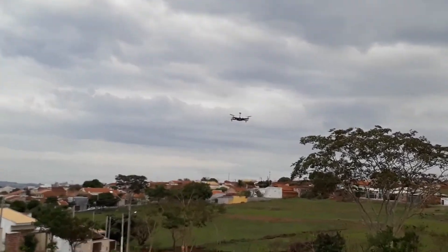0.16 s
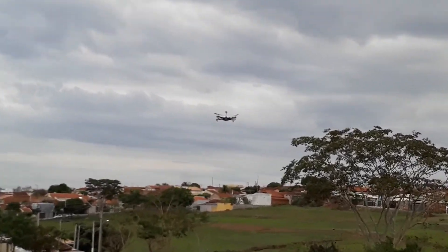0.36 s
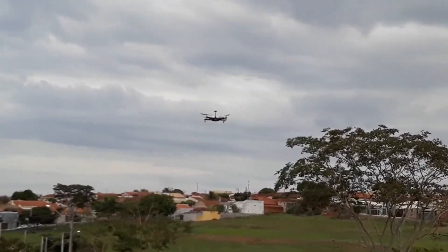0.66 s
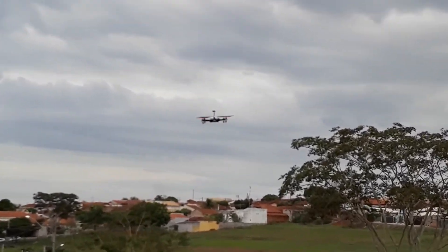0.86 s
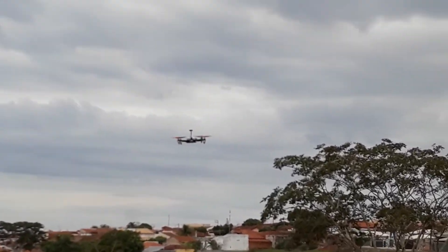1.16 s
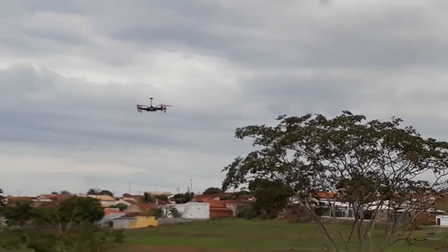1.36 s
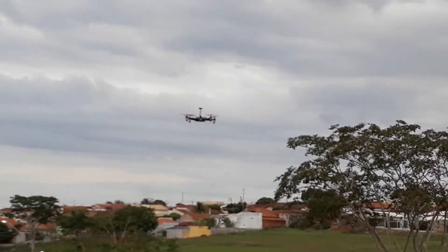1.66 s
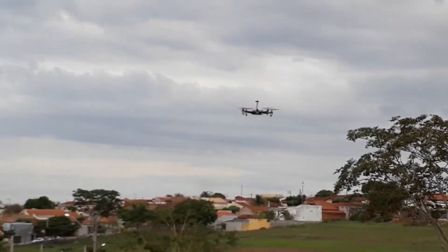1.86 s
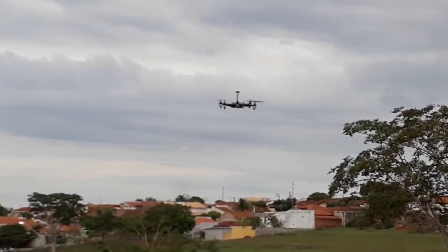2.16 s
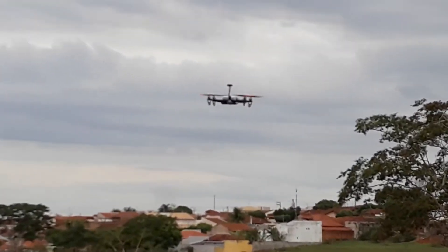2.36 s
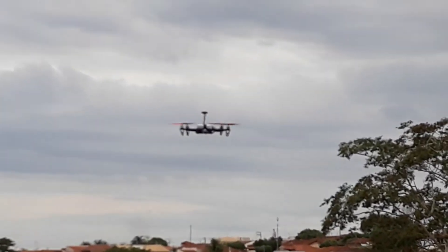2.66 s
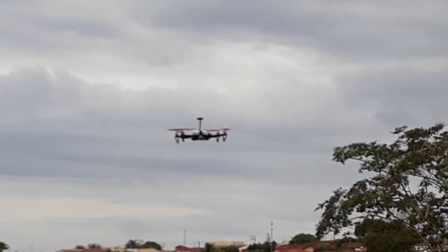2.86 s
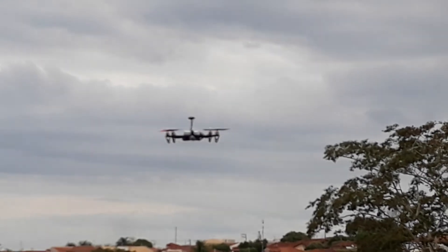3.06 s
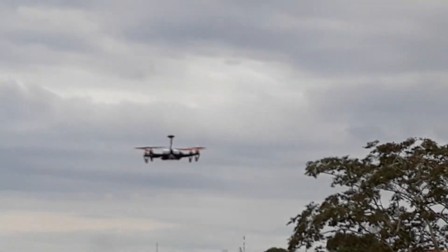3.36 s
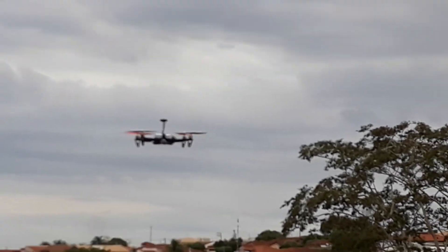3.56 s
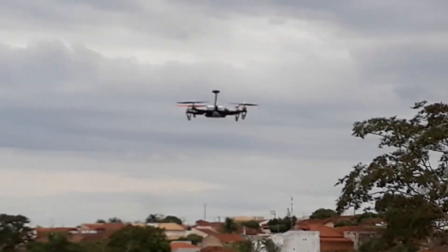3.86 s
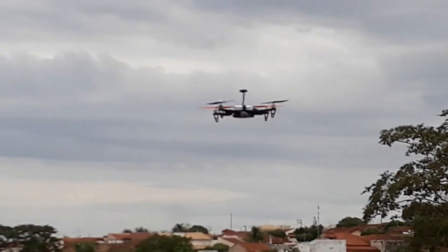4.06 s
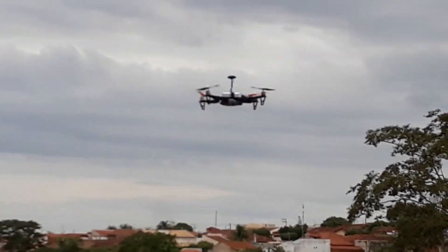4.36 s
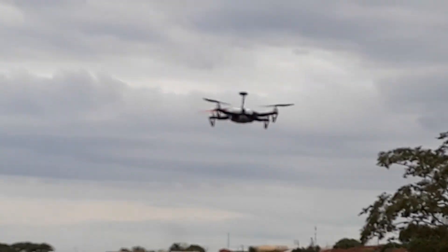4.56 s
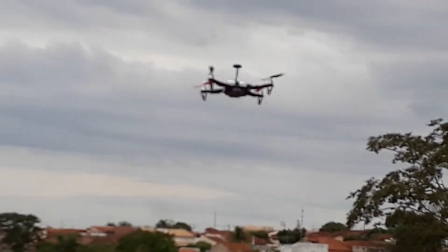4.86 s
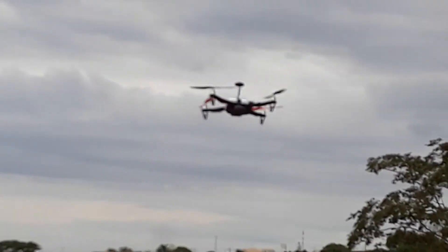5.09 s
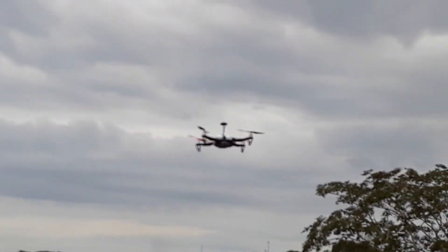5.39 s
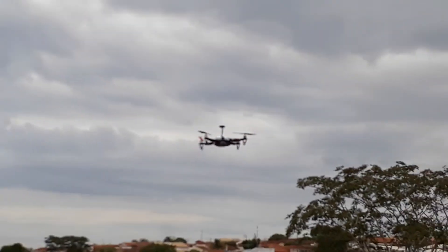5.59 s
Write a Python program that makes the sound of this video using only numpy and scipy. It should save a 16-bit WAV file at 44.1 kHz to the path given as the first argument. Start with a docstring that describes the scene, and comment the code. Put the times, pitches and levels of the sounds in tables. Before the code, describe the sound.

Outdoors, low gusts of wind buffet the microphone while a small drone whirs a little way off, its motors whining and shifting slightly in pitch. The wind hits hardest in the middle, then eases as the drone approaches. The propeller buzz and airy hiss swell to their loudest near the end, with a thin electronic whistle on top, over a very faint distant background of town and trees.

```python
"""Quadcopter approaching over open ground

A small quadcopter flies in towards a phone held above the ground, its four rotors trimming their speeds.
Each rotor buzzes at its blade rate, chops a rush of air and whines; the speed controllers whistle high.
A bounce off the ground combs the buzz and rush. Gusts buffet the microphone; town and trees lie far off."""
import sys
import numpy as np
from scipy import signal
from scipy.fft import rfft, irfft
from scipy.io import wavfile
from scipy.ndimage import uniform_filter1d, map_coordinates

SR = 44100
rng = np.random.default_rng(int(sys.argv[2]) if len(sys.argv) > 2 else 0)


def waveform_to_disk(signal):
    """Save audio, clipped to [-1, 1], as 16-bit WAV at the path in sys.argv[1]."""
    frames = np.transpose(np.atleast_2d(signal))
    scaled = np.clip(frames, -1, 1) * 32767
    samples = np.round(scaled).astype(np.int16)
    wavfile.write(sys.argv[1], SR, samples)


N = 252693
TIME = np.arange(N) / SR

# The throttle, heard as the pitch of the clearest motor. Each row: time in seconds, whine in Hz.
THROTTLE = [(0.0, 3833), (0.23, 3690), (0.93, 3941), (1.23, 3810), (1.42, 3880), (1.56, 3660), (1.66, 3803),
            (1.91, 3640), (3.19, 3778), (3.32, 3690), (3.52, 3858), (3.78, 3866), (3.87, 3946),
            (4.01, 3767), (4.52, 3785), (4.69, 3621), (5.01, 3946), (5.2, 3800), (5.53, 3685),
            (5.692, 3840), (5.73, 3810)]
# The four rotors. Each row: whine at hover in Hz, share of the throttle changes, slow trim of the
# whine in Hz, relative levels of buzz, air rush and whine in dB, flutter as a share of the speed.
ROTORS = [(3800, 0.98, 0, 0, -2, 0, 0.00402), (3239, .35, 42, -4, -8.5, -7.5, 0.00688),
          (4344, .55, 42, -9, -2.5, -3.5, 0.00706), (4531, .25, 28, -16.5, -1.5, 0.5, 0.00504)]
# Tone of the blade buzz. Each row: frequency in Hz, relative level in dB.
BUZZ_COLOUR = [(90, -20), (180, -6), (320, 2), (450, -2), (550, -1), (750, 1), (920, -1), (1100, -8),
               (1400, -5), (2500, -11), (3500, -19)]
# Partials of the motor whine, in multiples of the shaft rate, and their relative levels in dB.
WHINE_ORDERS = (42, 56, 84)
WHINE_ORDERS_DB = (0, -16, -14)
# The whines as the craft nears and turns. Each row: time in seconds, base level at hover speed in dB
# for the clearest motor, the same for the other three.
WHINE_LEVELS = [(0, -55, -69), (1.3, -59.5, -62.5), (2.25, -54.5, -55.5), (3.55, -53.5, -69),
                (3.88, -59, -75), (4.42, -50.5, -56), (5.06, -54.5, -69), (5.32, -64, -58),
                (5.68, -47, -59)]
# The approach, swelling as the craft comes close and brakes. Each row: time in seconds, swell in dB,
# relative levels of low rush, top rush and blade buzz in dB.
APPROACH = [(0, -3, 1.5, -7, -1.5), (.55, -2, 2, -8.5, 0.5), (1.26, -6, -0.5, -5, -4),
            (2.3, -2.5, 1.5, -5.5, -11.5), (3.1, 0, -3.5, -4, -1), (3.7, 2, -6.5, -6, 1.5),
            (4.72, 6.5, -6.5, -4.5, -1.5), (5.03, 9.5, -7, -6.5, 0), (5.3, 8.5, -5.5, -5, -8.5),
            (5.73, 5.5, -6, -3, -7.5)]
# Tone of the air rush. Each row: frequency in Hz, relative level in dB.
RUSH_COLOUR = [(150, -10), (280, 4.5), (450, 2), (700, 4), (1000, -3.5), (1900, -2), (2700, 0.5),
               (3400, -2), (4500, 2), (5200, 0), (6000, 1), (8700, 0.5), (9550, -5.5), (11300, -5.5),
               (13500, -11.5), (15700, -8)]
# Two bands of the rush that sweep as the craft banks. Each row: time in seconds, rasp centre in Hz,
# its relative level in dB, sheen centre in Hz, its relative level in dB.
BANKING = [(3.4, 2758, -30, 11150, -12.5), (4.0, 2770, -7.5, 11200, -4), (4.58, 2643, -5.5, 12900, -11),
           (4.8, 2400, -15, 11170, -4.5), (5.05, 2002, -7, 12080, -6.5), (5.6, 1849, -4.5, 12450, -9)]
# The bounce off the ground. Each row: time in seconds, lag behind the direct sound in milliseconds.
GROUND_LAG = [(0, 1.84), (3.9, 1.83), (4.15, 2.02), (5.35, 2.35)]
# The whistle the speed controllers share. Each row: time in seconds, pitch in Hz, level in dB.
SWITCHING = [(0, 14222, -68), (.9, 14182, -71), (1.6, 14210, -62), (3.1, 14235, -65), (4.1, 14214, -59),
             (4.5, 14210, -53), (5.0, 14198, -54), (5.4, 14156, -54.5)]
# The four controllers. Each row: offset from that whistle in Hz, level relative to it in dB.
CONTROLLERS = [(0, 0), (320, -3), (722, -12), (-180, -19)]
# Gusts on the microphone. Each row: start and length in seconds, levels of large and small eddies in dB.
GUSTS = [(0, 0.89, -38, -50), (0.934, 0.12, -34.5, -43), (1.15, 0.38, -42, -51), (1.598, 0.63, -30, -32),
         (2.271, 1.52, -30, -40.5), (4.171, 0.73, -37.5, -46), (4.961, .12, -36.5, -51),
         (5.101, 0.39, -44, -57), (5.494, 0.34, -35.5, -41)]
# Tone of the wind rumble. Each row: frequency in Hz, relative level in dB.
RUMBLE_COLOUR = [(12, -52), (20, -36), (80, -1), (128, -2), (177, -3.5), (248, 3), (400, -13), (520, -50),
                 (880, -120)]
# The hardest knocks of wind. Each row: start in seconds, relative peak level in dB, pitch in Hz,
# relative level of the small eddies in the wake in dB.
BUFFETS = [(0.047, -24.5, 94, -46), (0.285, -18, 132, -55), (0.392, -22.5, 116, -54),
           (0.586, -23, 108, -60), (1.017, -22, 175, -46), (1.462, -24, 123, -52), (1.619, -21, 193, -38),
           (1.828, -10.5, 153.5, -38), (1.945, -14, 136.5, -46), (2.312, -14, 126.3, -28.5),
           (2.402, -17, 122.8, -43.5), (2.656, -20.5, 93, -60), (2.829, -21, 112.2, -62),
           (2.934, -25.5, 102.4, -38.5), (3.039, -21.5, 102.2, -45), (4.515, -21, 115, -45),
           (4.809, -23, 139, -50), (5.506, -22.5, 95, -46)]
# Town and trees in the distance. Each row: frequency in Hz, relative level in dB.
DISTANT_COLOUR = [(60, 17), (250, 3), (450, -5.5), (800, 1), (1400, 0), (2000, -16), (6000, -40)]


def undb(db):
    """Decibels to gain."""
    return 10 ** (np.asarray(db) / 20)


def unit(x):
    """Scale to rms 1."""
    return x / np.sqrt(np.mean(x ** 2))


def curves(table):
    """The columns of a table of timed rows, drawn out to every sample."""
    seconds, *columns = np.transpose(table)
    return [np.interp(TIME, seconds, column) for column in columns]


def gain_at(hz, points):
    """Gain of a (Hz, dB) spectrum at the given frequencies."""
    point_hz, db = np.transpose(points)
    return undb(np.interp(np.log(hz + 1e-9), np.log(point_hz), db))


def colour(x, points):
    """Shape a sound by a (Hz, dB) spectrum."""
    return irfft(rfft(x) * gain_at(np.fft.rfftfreq(N, 1 / SR), points), N)


def lowpass(x, hz, order=4):
    """Smooth low-pass without delay."""
    return irfft(rfft(x) / (1 + (np.fft.rfftfreq(N, 1 / SR) / hz) ** order), N)


def wander(rate_hz):
    """Smooth random drift of spread 1."""
    return unit(lowpass(rng.standard_normal(N), rate_hz))


def hold_power(x):
    """Keep the lumps of a sound but hold its power over a fifth of a second or so."""
    power = uniform_filter1d(x ** 2, int(.13 * SR))
    return x / np.sqrt(uniform_filter1d(power, int(.09 * SR)))


def blade_buzz(turns, shaft_hz, imbalance_db=-9):
    """Shaft harmonics: two blades favour the even ones, and turbulent inflow shakes each of them."""
    buzz = 0
    for k in range(1, 36):
        shake_db = 3 * np.interp(TIME, np.linspace(0, TIME[-1], 200), rng.standard_normal(200))
        gain = gain_at(k * shaft_hz.mean(), BUZZ_COLOUR) * undb(imbalance_db * (k % 2) + shake_db)
        buzz += gain * np.sin(2 * np.pi * (k * turns + rng.random()))
    return unit(buzz)


def chopped_air(turns, depth=0.33):
    """The rush swells each time a blade tip swings towards the microphone, twice a turn."""
    return (1 + depth * np.cos(2 * np.pi * 2 * turns)) * rng.standard_normal(N)


def motor_whine(turns, waver_db=2.4):
    """Magnets passing the stator teeth sing at high multiples of the shaft rate."""
    whine = 0
    for order, db in zip(WHINE_ORDERS, WHINE_ORDERS_DB):
        whine += undb(db + waver_db * wander(65)) * np.sin(2 * np.pi * order * turns)
    return unit(whine)


def rotors(hover_throttle_hz=3800, flex_turns=0.011, effort_db_per_hz=0.0428):
    """Four rotors, each turning at its own speed; returns their buzz, air rush and motor whine."""
    throttle_hz = curves(THROTTLE)[0] - hover_throttle_hz
    clearest_db, others_db = curves(WHINE_LEVELS)
    buzz = rush = whine = 0
    for level_db, rotor in zip([clearest_db] + 3 * [others_db], ROTORS):
        hover_hz, follow, trim_hz, buzz_db, rush_db, whine_db, flutter = rotor
        # each motor follows the throttle and is trimmed on its own to keep the craft level
        effort_hz = follow * throttle_hz + trim_hz * wander(2.5)
        # the flight controller keeps nudging each motor
        shaft_hz = (hover_hz + effort_hz) / WHINE_ORDERS[0] * (1 + flutter * wander(28))
        turns = np.cumsum(shaft_hz) / SR + rng.random()
        # the blades flex in the eddies, so they run less evenly than the motor
        buzz += undb(buzz_db) * blade_buzz(turns + flex_turns * wander(28), shaft_hz)
        rush += undb(rush_db) * chopped_air(turns)
        # a motor whines louder the harder it works
        whine += undb(level_db + whine_db + effort_db_per_hz * effort_hz) * motor_whine(turns)
    return unit(buzz), rush, whine


def tilted_rush(rush, low_db, top_db, low_hz=3000, top_hz=10000):
    """The tilt of the craft sets how much of each end of the rush reaches the microphone."""
    rush = unit(colour(rush, RUSH_COLOUR))
    low = lowpass(rush, low_hz)
    top = rush - lowpass(rush, top_hz, order=16)
    middle = rush - low - top
    tilted = undb(low_db + 1.63) * low + middle + undb(top_db + 6.5) * top
    return undb(4 + 0.5 * wander(13)) * tilted


def tip_noise(centre_hz, half_width_hz):
    """A band of blade-tip noise whose centre slides."""
    angle = 2 * np.pi * np.cumsum(centre_hz) / SR
    return unit(wander(half_width_hz) * np.cos(angle) + wander(half_width_hz) * np.sin(angle))


def ground_bounce(direct, share=.56, dull_hz=5500):
    """The path by way of the ground lags more as the craft comes near, sliding a comb through the sound."""
    lag_ms, = curves(GROUND_LAG)
    late_samples = np.arange(N) - lag_ms * SR / 1000
    dulled = lowpass(direct, dull_hz, order=2)
    return direct + share * map_coordinates(dulled, [late_samples], order=3)


def controller_whistles(jitter_hz=4, waver_db=1.6):
    """The speed controllers switch with four thin whistles that drift together."""
    hz, db = curves(SWITCHING)
    whistles = 0
    for offset_hz, offset_db in CONTROLLERS:
        turns = np.cumsum(hz + offset_hz + jitter_hz * wander(30)) / SR
        tone = undb(waver_db * wander(19)) * np.sin(2 * np.pi * turns)
        whistles += undb(db + offset_db) * unit(tone)
    return whistles


def gusts(attack_s=0.028, sag_db_per_s=8, release_s=.06, breeze_db=-63):
    """Gains of large and small eddies: gusts hit, slacken and die to a breeze; the strongest prevails."""
    strength = np.full((2, N), undb(breeze_db))
    for start, length, large_db, small_db in GUSTS:
        age = np.maximum(TIME - start, 0)
        shape = np.minimum(age / attack_s, 1) * undb(-sag_db_per_s * age)
        shape *= np.exp(-np.maximum(age - length, 0) / release_s)
        strength = np.maximum(strength, np.outer(undb([large_db, small_db]), shape))
    return strength


def wind(rumble_top_hz=165):
    """Turbulence right on the microphone: large eddies rumble, small ones flutter in the same lumps."""
    large_gain, small_gain = gusts()
    lumps = undb(3.6 * wander(28))
    rumble = lowpass(colour(rng.standard_normal(N), RUMBLE_COLOUR), rumble_top_hz, order=8)
    flutter = colour(rng.standard_normal(N),
                     [(110, -6), (175, 9.5), (250, 0), (330, -7), (450, -21.5), (900, -60), (3000, -84)])
    return large_gain * hold_power(lumps * rumble) + small_gain * hold_power(lumps * flutter)


def buffets(flow, rise_s=0.01102, half_width_cycles=0.68, wake_delay_s=0.0089, wake_s=0.0078):
    """Single large eddies push the flow aside: a short push and pull, breaking up into a rough puff."""
    out = flow.copy()
    puff = unit(colour(rng.standard_normal(N),
                       [(150, 11.5), (310, 17.5), (560, -1.5), (800, -13), (1500, -64)]))
    for (start, peak_db, hz, wake_db), phase in zip(BUFFETS, rng.random(len(BUFFETS))):
        near = np.abs(TIME - start) < .08
        age = TIME[near] - start
        cycles = (age - rise_s) * hz
        pressure = undb(peak_db - 1) * np.sin(2 * np.pi * (cycles + phase))
        share = np.exp(-(cycles / half_width_cycles) ** 2)
        out[near] += share * (pressure - out[near])
        wake = np.exp(-((age - wake_delay_s) / wake_s) ** 2)
        out[near] += undb(wake_db + 3) * wake * puff[near]
    return out


def town_and_trees(level_db=-56.5):
    """A soft wash from far off that swells slowly."""
    return undb(level_db + wander(0.9)) * unit(colour(rng.standard_normal(N), DISTANT_COLOUR))


def scene(mid_distance_db=-53):
    """Craft, wind and surroundings reach one microphone, so both channels are alike."""
    swell_db, low_db, top_db, buzz_db = curves(APPROACH)
    rasp_hz, rasp_db, sheen_hz, sheen_db = curves(BANKING)
    buzz, rush, whine = rotors()
    air = tilted_rush(rush, low_db, top_db)
    air += undb(rasp_db) * tip_noise(rasp_hz, half_width_hz=600)
    air += undb(sheen_db) * tip_noise(sheen_hz, half_width_hz=1100)
    blades = undb(mid_distance_db + swell_db) * (undb(buzz_db) * buzz + air)
    craft = ground_bounce(blades) + whine + controller_whistles()
    sound = craft + buffets(wind()) + town_and_trees()
    return np.array([sound, sound])


def record(dry, low_cut_hz=44, top_hz=15750):
    """The phone cuts the deepest bass and the very top."""
    dry = signal.sosfilt(signal.butter(2, low_cut_hz, "high", fs=SR, output="sos"), dry)
    return signal.sosfilt(signal.ellip(10, .2, 80, top_hz, fs=SR, output="sos"), dry)


dry = scene()
out = record(dry)
waveform_to_disk(out)
```